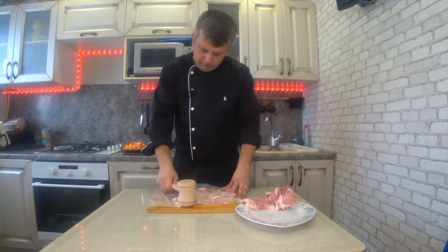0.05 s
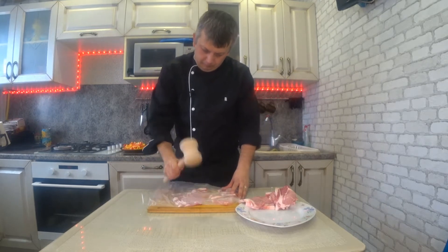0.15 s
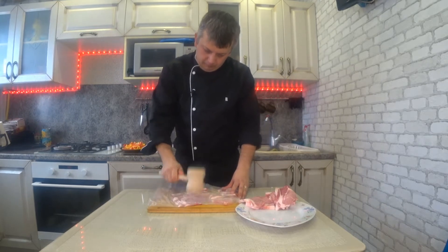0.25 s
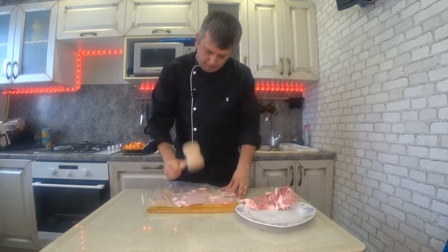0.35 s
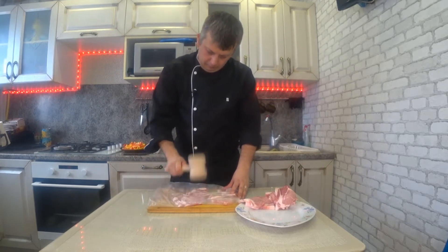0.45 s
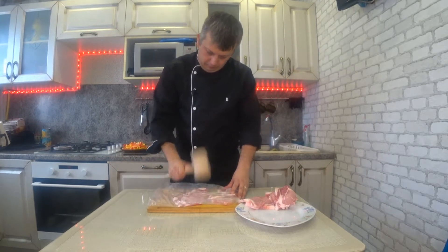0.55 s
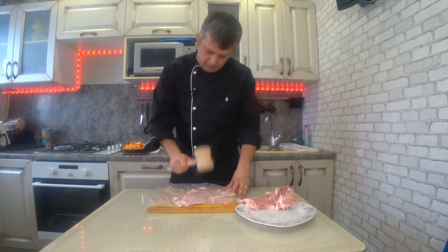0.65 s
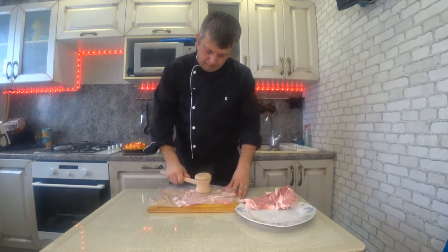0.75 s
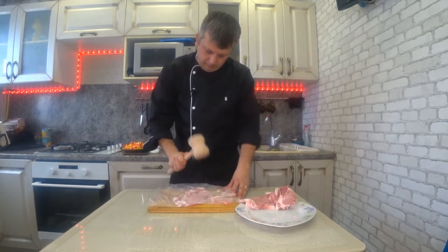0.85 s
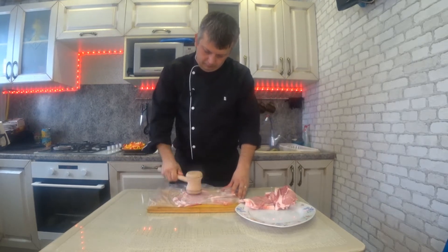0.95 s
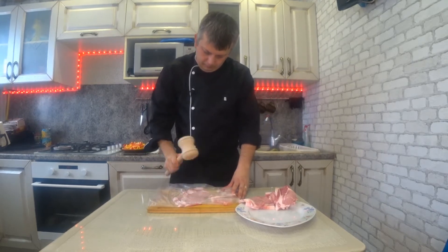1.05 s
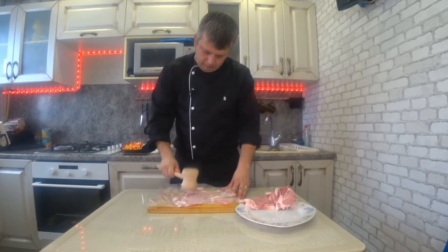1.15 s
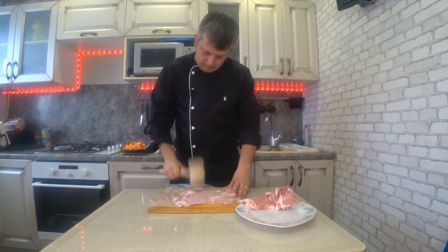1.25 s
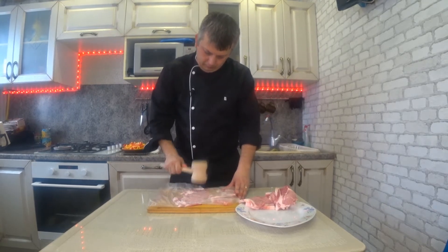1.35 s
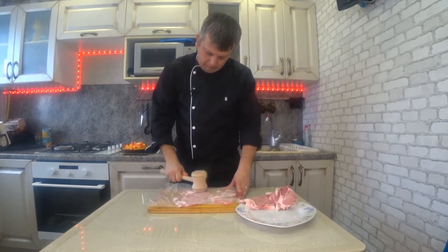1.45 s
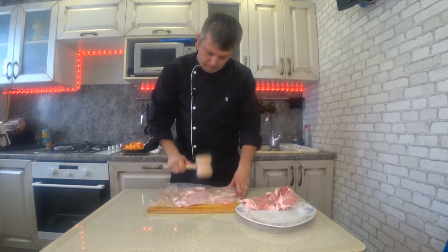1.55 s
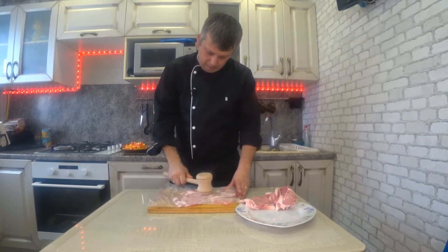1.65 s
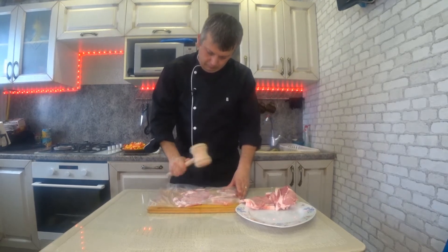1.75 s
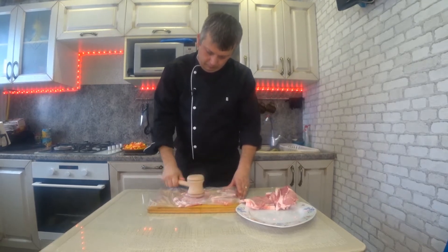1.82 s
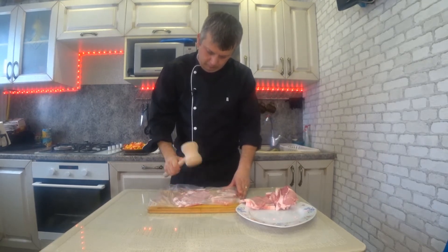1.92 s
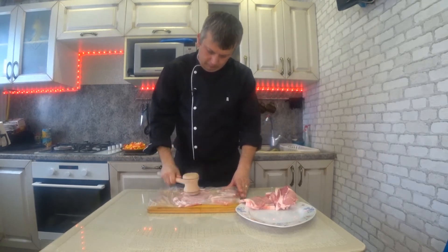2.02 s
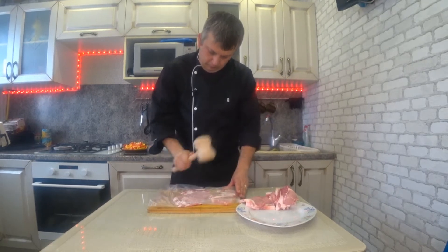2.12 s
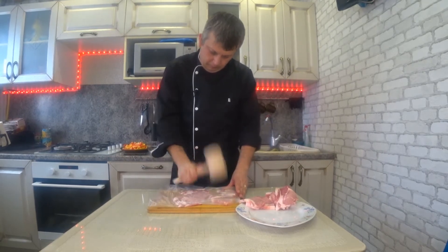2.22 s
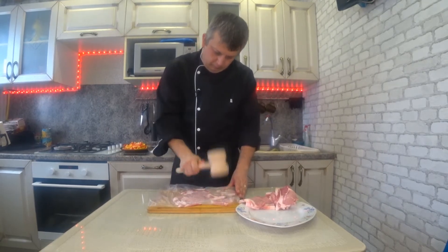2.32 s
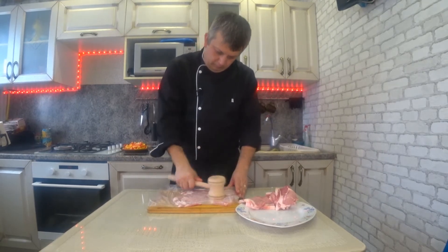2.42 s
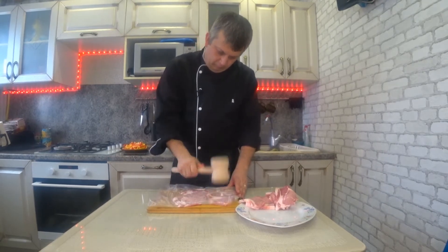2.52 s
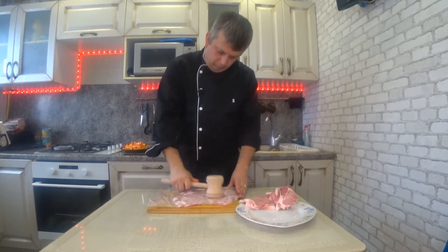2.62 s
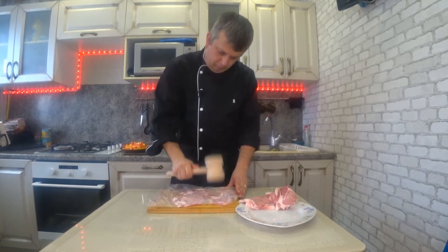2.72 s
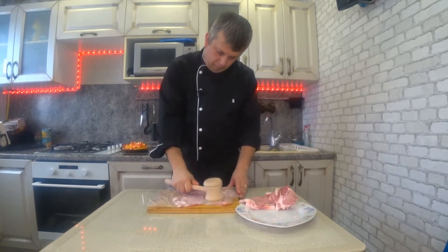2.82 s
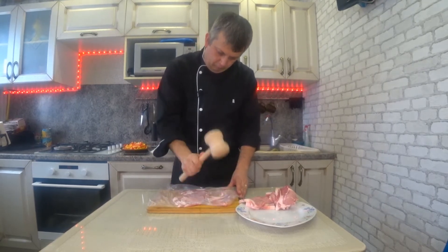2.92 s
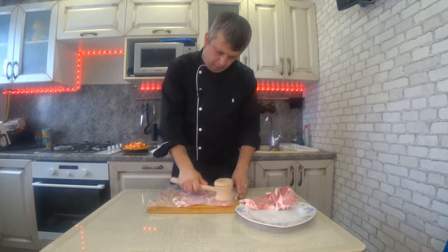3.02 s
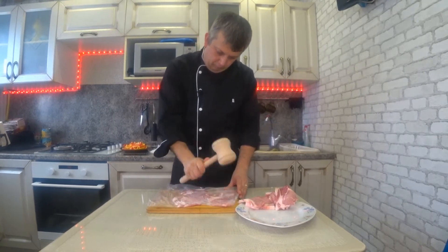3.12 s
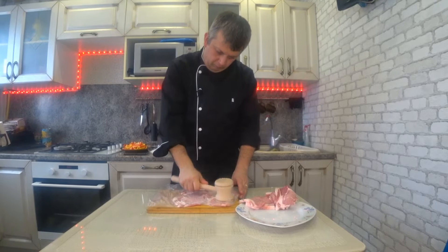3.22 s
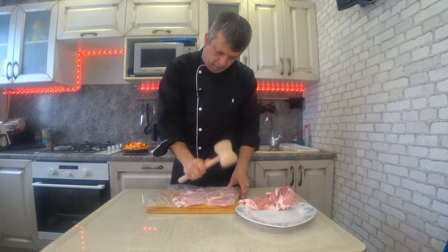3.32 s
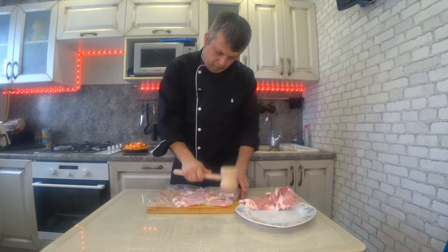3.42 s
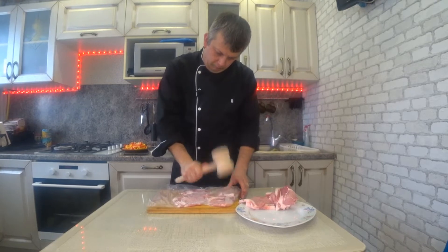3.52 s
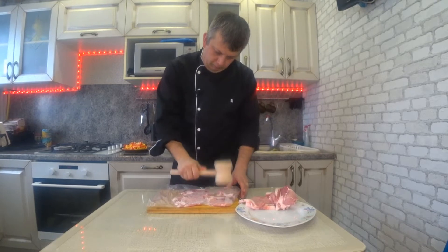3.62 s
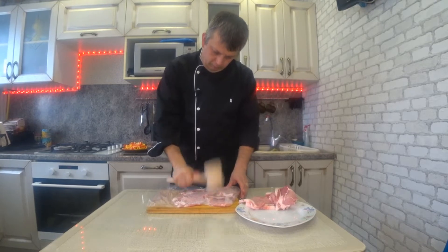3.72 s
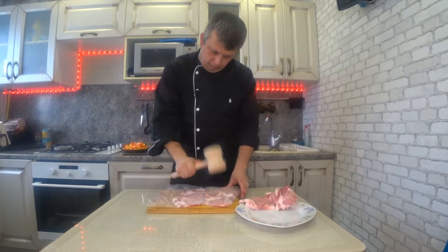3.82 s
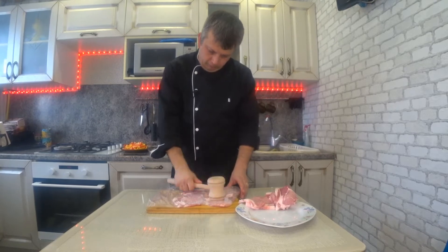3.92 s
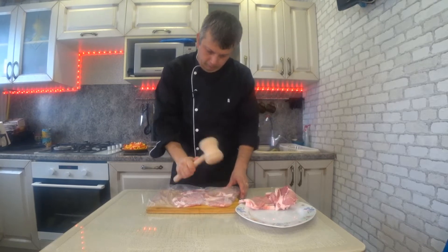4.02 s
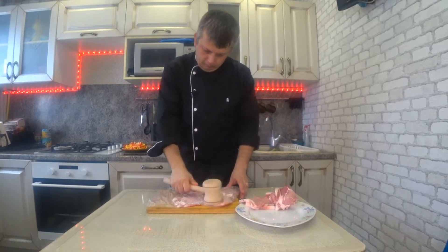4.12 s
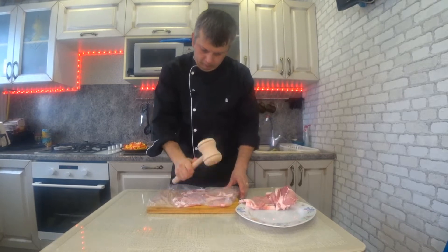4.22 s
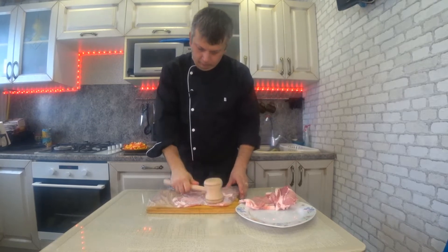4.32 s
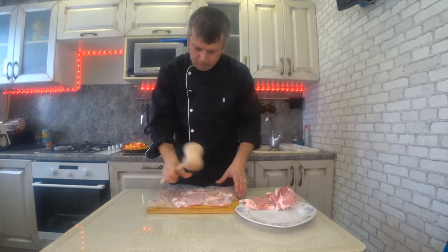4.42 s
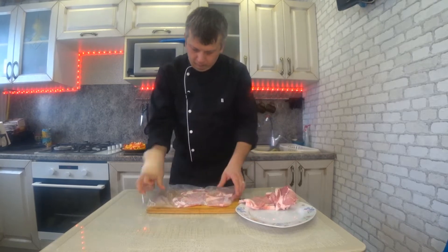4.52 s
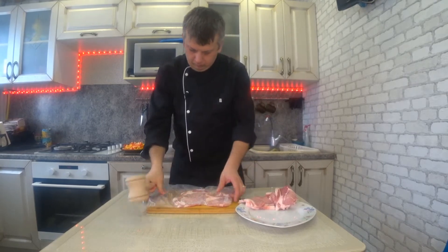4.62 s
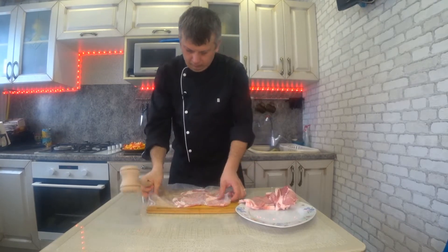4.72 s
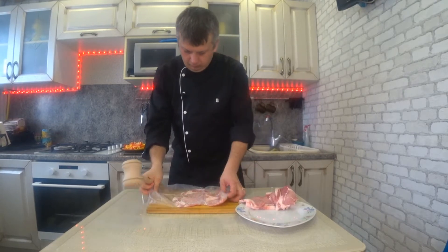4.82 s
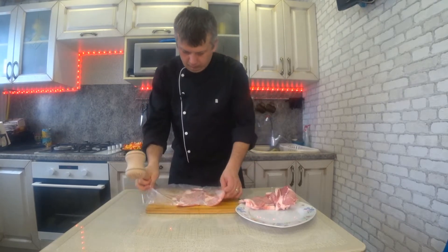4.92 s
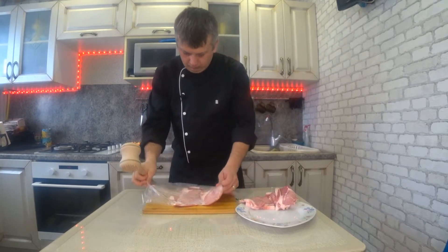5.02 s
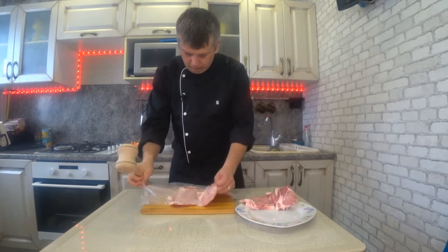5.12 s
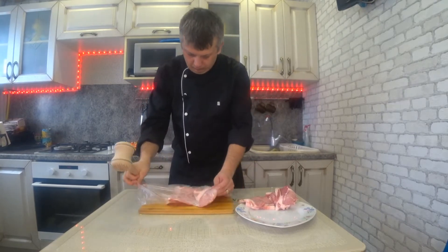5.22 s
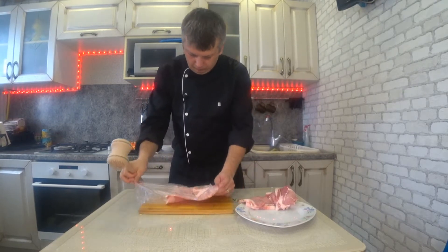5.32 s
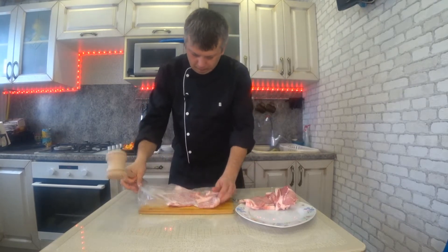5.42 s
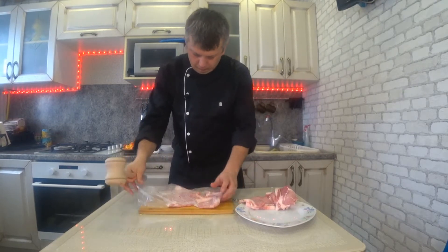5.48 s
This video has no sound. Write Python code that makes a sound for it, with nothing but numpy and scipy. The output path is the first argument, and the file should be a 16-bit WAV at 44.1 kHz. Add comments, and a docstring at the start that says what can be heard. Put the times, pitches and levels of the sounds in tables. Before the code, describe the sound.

A wooden mallet pounds meat in a plastic bag on a board, about five quick thuds a second, then the bag rustles in a small kitchen.

```python
"""A fridge hums, as two sine tones, under faint air noise in a small hard-walled kitchen.
From the start a wooden mallet pounds meat in a plastic bag on a board: each blow is a snap of squeezed air,
a thud of damped board swings and a ring of room modes under fading noise; the bag creaks in short bursts.
Then the bag is pulled about and rustles as random pops, the board is knocked and the meat is laid down with
a rumble. A fast gain control squashes the blows and pumps up the room's ring behind them."""
import sys
import numpy as np
from scipy import signal
from scipy.fft import rfft, irfft, next_fast_len
from scipy.io import wavfile
from scipy.ndimage import map_coordinates

SR = 44100
rng = np.random.default_rng(int(sys.argv[2]) if len(sys.argv) > 2 else 0)


def output_pcm(signal):
    """Save a mono or channel-first signal as 16-bit PCM at the path in sys.argv[1].

    Samples are clipped to [-1, 1] before scaling.
    """
    pcm = np.clip(np.atleast_2d(signal).T, -1, 1) * 32767
    wavfile.write(sys.argv[1], SR, np.round(pcm).astype(np.int16))


N = 244755
TIME = np.arange(N) / SR


def amp(db):
    """Level to amplitude: 20 dB is a factor of ten."""
    return 10 ** (np.asarray(db) / 20)


def unit(x):
    """Normalisation: x brought to rms 1."""
    return x / np.sqrt(np.mean(x ** 2) + 1e-20)


def along(points, hz):
    """Logarithmic frequency scale: (Hz, value) points are joined by straight lines on it."""
    f, v = np.transpose(points)
    return np.interp(np.log(hz + 1), np.log(f + 1), v)


def filtered(x, response):
    """Linear filtering: the spectrum of x is multiplied by a response of frequency."""
    n = x.shape[-1]
    padded = next_fast_len(n + 4096)
    spectrum = rfft(x, padded) * response(np.fft.rfftfreq(padded, 1 / SR))
    return irfft(spectrum, padded)[..., :n]


def noise(spectrum, size):
    """Coloured noise: white noise shaped by (Hz, dB) points, at rms 1."""
    return unit(filtered(rng.standard_normal(size), lambda hz: amp(along(spectrum, hz))))


def add(track, s, x):
    """Superposition: x is mixed into the track from time s on; what falls outside is lost."""
    start = round(s * SR)
    x, start = x[max(-start, 0):], max(start, 0)
    track[start:start + len(x)] += x[:max(N - start, 0)]


def fading(x):
    """Reverberant decay: each frequency of x falls by 60 dB in its own time, the top soonest."""
    # Decay of the kitchen. Each row: frequency in Hz, t60 in seconds.
    decay_times = [(100, 0.47), (400, 0.38), (1500, 0.38), (4000, 0.41), (10000, 0.3)]
    hz, t, z = signal.stft(x, SR, nperseg=256)
    decay = amp(-60 * t / along(decay_times, hz)[:, None])
    return signal.istft(z * decay, SR, nperseg=256)[1][:len(x)]


def fridge():
    """Steady tonal hum: sine tones of constant level and random phase."""
    # Tones of the fridge. Each row: frequency in Hz, rms level in dB.
    tones = [(48.4, -52), (183, -63)]
    return sum(amp(db) * np.sqrt(2) * np.sin(2 * np.pi * (hz * TIME + rng.random())) for hz, db in tones)


def air():
    """Stationary background noise: random air motion, strongest in the bass."""
    # Colour of the background. Each row: frequency in Hz, relative level in dB per Hz.
    air_colour = [(20, -0.5), (45, 3), (80, -4), (160, -2.5), (400, -6), (1000, -20.5), (4000, -24),
                  (11000, -32.5)]
    return amp(-47) * noise(air_colour, N)


def pocket(x, centre_hz, lift_db, width):
    """Cavity resonance: air trapped under the film lifts a band as it is squeezed out."""
    return filtered(x, lambda hz: amp(lift_db / (1 + ((hz - centre_hz) / (width * centre_hz)) ** 2)))


def snap(t, swell, pocket_hz, shut=0.0031, echo_db=-15, echo_s=0.0094):
    """Jet noise: air spits ever harder from the closing gap until impact at t = 0; the near wall answers."""
    # Colour of the hiss. Each row: frequency in Hz, relative level in dB per Hz.
    hiss_colour = [(200, 19), (700, 3), (1500, 4.5), (3000, 2), (6000, -2), (11000, -7)]
    hiss = unit(pocket(noise(hiss_colour, len(t)), pocket_hz, lift_db=2.5, width=0.059))
    squirt = np.exp(np.minimum(t / swell, -t / shut))
    echo = amp(echo_db) * np.exp(np.minimum((t - echo_s) / 0.0049, (echo_s - t) / 0.022))
    return hiss * (squirt + echo)


def thud(t, stiff_hz=135):
    """Damped oscillation: the board is pushed down and swings back; it is too small to radiate deep bass."""
    # First swing of the board, damped by the meat, before a pitch shift from blow to blow.
    # Each row: frequency in Hz, level in dB, t60 in seconds.
    swings = [(147, -8.5, 0.14), (220, -4.5, 0.034), (400.5, -7.5, 0.042), (525, -47, 0.023)]
    turn = 2 * np.pi * t * np.exp(0.07 * rng.standard_normal())
    swing = sum(amp(db - 60 * t / t60) * np.sin(hz * turn) for hz, db, t60 in swings)
    return -signal.lfilter(*signal.butter(2, stiff_hz, "high", fs=SR), swing)


def room_modes(t, place):
    """Modal excitation: the place of the blow sets the level of each low mode of table and kitchen."""
    # Low ring of table and kitchen, before small random shifts of pitch and level at each blow.
    # Each row: frequency in Hz, level in dB struck at the board's left, in dB at its right, t60 in seconds.
    modes = [(100.7, -12.5, -16, 0.64), (127, -27, -14, 0.59), (147.3, -7.5, -3, 0.42),
             (158.8, -16, -10.5, 0.32), (181.6, 2.5, -23.5, 0.48), (200.2, -2.5, -5, 0.33),
             (241.5, -10.5, -5, 0.73), (269.8, -4.5, -1, 0.62), (304, -4.5, -5, 0.44),
             (310.6, 2.5, 1.5, 0.31), (383.7, -1, -20.5, 0.27), (403, -16, -29, 0.48),
             (468.3, -18, -6.5, 0.52), (560.6, -4.5, -7, 0.22), (590, -8.5, -11, 0.22)]
    detune = 0.008  # the load of meat and mallet shifts the pitch, as a share of the frequency
    ring = np.zeros(len(t))
    for hz, left, right, t60 in modes:
        level_db = left + place * (right - left) + rng.normal(0, 2.14)
        shifted_hz = hz * (1 + detune * rng.normal())
        ring += amp(level_db - 60 * t / t60) * np.sin(2 * np.pi * (shifted_hz * t + rng.random()))
    return ring


def reverberation(t, place, knock_db, smack_db, pocket_hz, low_rise=0.011, high_rise=0.0072):
    """Reverberation: the kitchen rings on with the colour of the blow, low modes under a dense wash."""
    # Colours of deep boom, wooden knock, wet smack and film fizz.
    # Each row: frequency in Hz, relative level in dB per Hz.
    boom_colour = [(25, 6), (70, -11), (105, -6), (150, 0.5), (270, 3), (335, 6.5), (370, -69), (600, -33)]
    knock_colour = [(280, -38), (375, -0.5), (470, -1.5), (600, -7), (760, -11), (1000, -18), (1400, -31),
                    (3000, -75)]
    smack_colour = [(450, -17), (850, 0.5), (1100, 0), (1450, 4.5), (1900, 2), (2400, -1.5), (3500, -7.5),
                    (5000, -14.5), (10000, -45)]
    fizz_colour = [(1500, -39), (3000, 1.5), (4300, -1), (5500, -2), (7500, -5), (11000, -9.5)]
    n = len(t)
    wash = amp(-6) * noise(boom_colour, n) + amp(knock_db) * noise(knock_colour, n)
    wood = amp(-4) * room_modes(t, place) + fading(wash)
    fizz = amp(-6.5) * noise(fizz_colour, n)
    film = amp(smack_db) * (noise(smack_colour, n) + fizz)
    clumps = amp(map_coordinates(rng.standard_normal(n), [t * 250]))  # echoes arrive in clumps
    film = fading(clumps * pocket(film, pocket_hz, lift_db=3, width=0.13))
    # bright reflections pile up sooner; the standing waves need a few trips across the room
    return wood * (1 - np.exp(-t / low_rise)) + film * (1 - np.exp(-t / high_rise))


def mallet():
    """Impact: every blow snaps the bag, swings the board and sets the room ringing."""
    # Mallet blows; the first lands before time 0, so only its tail is heard.
    # Each row: time in seconds, room ring in dB, wood knock over the ring in dB, wet smack over the ring
    # in dB, direct thud in dB, direct snap in dB, air pocket in Hz.
    blows = [ (-.125, -13, -19, -12, -3, -12.5, 3020), (0.0426, -9, -7.5, -14, 0, -8.5, 6400),
             (0.2083, -9, -4.5, -10.5, -7, -21, 7740), (.404, -12, -12.5, -9.5, -0.5, -5.5, 4450),
             (.5815, -17, -6, -8.5, -22, -31, 1680), (.7514, -13.5, 0.5, -4, -1, -11, 3900),
             (0.9382, -16.5, -7.5, -7.5, -1, -6.5, 6550), (1.12, -14, -3, -10, 0, -8.5, 2680),
             (1.3013, -17, -6, -7.5, 3.5, -1, 6740), (1.4862, -16.5, -3, -8, -0.5, -8.5, 1800),
             (1.6583, -15.5, 0.5, -5, -3, -14, 4000), (1.8359, -15, -5, -7.5, -13, -23.5, 4000),
             (2.006, -14, -3, -9, 0.5, -17, 3950), (2.2446, -17, -13, -8, -3, -5, 1780),
             (2.447, -11, -5, -13, 8, -4, 1330), (2.6575, -15, -6.5, -13.5, -6, -13.5, 3340),
             (2.8366, -12.5, -7.5, -11, -4, -8.5, 5840), (3.0252, -15, -9.5, -9, 1, -0.5, 5340),
             (3.2094, -13, -3.5, -11.5, -5.5, -9, 1100), (3.3837, -18, -8, -8.5, -12, -5, 1850),
             (3.5558, -14, -3.5, -11, -6.5, -15, 1840), (3.7384, -12.5, -6.5, -11, -10, -23, 7400),
             (3.9337, -14, -3, -10, -6.5, -15.5, 1140), (4.1224, -15, -5.5, -11.5, -4.5, -6, 2700),
             (4.297, -15.5, -2.5, -11.5, -9, -26, 1070), ]
    # The mallet works along the board. Each row: time in seconds, place from 0 (left) to 1 (right).
    places = [(0, 0.24), (2.0, 0.084), (2.3, 0.59), (4.4, 0.53)]
    # swell of the snap at a 0 dB thud; a softer blow squeezes the air out more slowly
    squirt_s, squirt_slowing = 0.0006, 0.42
    lead = 0.02  # seconds of snap before impact
    out, t = np.zeros(N), np.arange(SR * 2 // 3) / SR
    for s, ring_db, knock_db, smack_db, thud_db, snap_db, pocket_hz in blows:
        place = np.interp(s, *np.transpose(places))
        swell = squirt_s / amp(thud_db) ** squirt_slowing
        add(out, s - lead, amp(snap_db) * snap(t - lead, swell, pocket_hz))
        add(out, s + 0.00059, amp(thud_db) * thud(t))
        add(out, s, amp(ring_db) * reverberation(t, place, knock_db, smack_db, pocket_hz))
    return out


def crackle(rate, blur_db):
    """Random impulses: tiny buckles of the film, rate a second, in flurries and blurred by noise; rms 1."""
    # Colour of the film. Each row: frequency in Hz, relative level in dB per Hz.
    film_colour = [(900, -26), (2200, -2), (4000, -2.5), (6300, 0), (9000, -3), (11000, -7.5)]
    pops = (rng.random(N) < rate / SR) * rng.standard_normal(N)
    flurries = amp(1.5 * map_coordinates(rng.standard_normal(N), [TIME * 70]))
    grains = flurries * (unit(pops) + amp(blur_db) * rng.standard_normal(N))
    return unit(filtered(grains, lambda hz: amp(along(film_colour, hz))))


def reflections(x):
    """Convolution with a decaying noise of unit energy: the kitchen's answer to x."""
    tail = fading(rng.standard_normal(SR // 2))
    return signal.fftconvolve(x, tail / np.linalg.norm(tail))[:N]


def creaking():
    """Stick and slip: the bag creaks in short bursts under the holding hand, and the room answers."""
    # Creaks of the bag. Each row: time of the peak in seconds, level in dB, decay constant in seconds.
    creaks = [(0.034, -38, 0.0068), (1.286, -46, 0.0066), (2.205, -38, 0.018), (2.65, -42, .008),
              (3.371, -38.5, 0.0056), (4.846, -38, .02), (5.28, -39, .006), (5.297, -42, .008),
              (5.407, -29.5, 0.011)]
    bursts = sum(amp(db) * np.exp(np.minimum((TIME - s) / 0.0028, (s - TIME) / length))
                 for s, db, length in creaks)
    sound = bursts * crackle(rate=3000, blur_db=-31)
    return sound + reflections(sound)


def stroke(s, hold, attack, release):
    """Exponential envelope: it swells up to time s, holds and dies away."""
    return np.exp(np.minimum(np.minimum((TIME - s) / attack, (s + hold - TIME) / release), 0))


def rustling():
    """Buckling and friction: each pull makes the film crackle and rubs its folds together."""
    # Pulls at the bag. Each row: time of full pull in seconds, hold in seconds, film crackle in dB,
    # rubbing of the folds in dB.
    pulls = [(4.558, .04, -49, -50.5), (4.625, .04, -43.5, -47.5), (4.681, 0.034, -36, -41.5),
             (4.79, .04, -45.5, -57), (4.844, 0.15, -38, -43.5), (5.015, 0.073, -36, -40),
             (5.134, 0.064, -36.5, -39.5), (5.21, .16, -35, -37.5), (5.395, 0.023, -31, -33),
             (5.545, .05, -39, -54)]
    # Colour of the rubbing folds. Each row: frequency in Hz, relative level in dB per Hz.
    folds_colour = [(100, -15), (200, -22), (400, 3), (650, -0.5), (1100, 2), (1900, 3.5), (3000, -17),
                    (6000, -6.5)]
    attack_s, release_s = 0.022, 0.039  # the film tightens quickly and relaxes more slowly
    settle_db, settle_s = -4, 0.078  # creases keep ticking after the hand stops
    crackling, rubbing = np.zeros(N), np.zeros(N)
    for s, hold, crackle_db, folds_db in pulls:
        settling = amp(settle_db) * stroke(s, hold, attack_s, settle_s)
        pull = np.maximum(stroke(s, hold, attack_s, release_s), settling)
        # overlapping pulls add in power
        crackling = np.hypot(crackling, amp(crackle_db) * pull)
        rubbing = np.hypot(rubbing, amp(folds_db) * pull)
    return crackling * crackle(rate=3300, blur_db=3.5) + rubbing * noise(folds_colour, N)


def board_bumps():
    """Modal ringing: soft bumps excite the board and the room, more slowly the longer the contact."""
    # Bumps on the board. Each row: time in seconds, level in dB, contact time constant in seconds.
    bumps = [(4.578, -32, 0.0036), (4.7224, -20.5, 0.00035), (5.383, -30.5, 0.003), (5.413, -27.5, 0.00055)]
    # Modes of the board. Each row: frequency in Hz, level in dB, t60 in seconds.
    board_modes = [(110, -33, 0.021), (184, -11, 0.12), (376.6, 6, 0.035), (496, -9, 0.014),
                   (694, -8, 0.022), (1370, -3, 0.017), (2020, -9, 0.017)]
    # Colour of their echo. Each row: frequency in Hz, relative level in dB per Hz.
    echo_colour = [(90, -19), (180, 6.5), (270, -4), (390, 3), (700, -5), (1100, -12), (2000, -19),
                   (5000, -37)]
    out, t = np.zeros(N), np.arange(SR // 3) / SR
    ring = sum(amp(db - 60 * t / t60) * np.sin(2 * np.pi * hz * t) for hz, db, t60 in board_modes)
    for s, db, contact in bumps:
        wash = fading(noise(echo_colour, len(t)))
        add(out, s, amp(db) * (ring + amp(-12) * wash) * (1 - np.exp(-t / contact)))
    return out


def meat_shoves():
    """Friction noise: meat shoved and laid down on the board gives a low rumble."""
    # Shoves of the meat. Each row: time of full shove in seconds, hold in seconds, rumble in dB.
    shoves = [(5.304, 0.063, -29.5), (5.40, .04, -38), (5.467, .015, -35)]
    # Colour of the rumble. Each row: frequency in Hz, relative level in dB per Hz.
    rumble_colour = [(15, 9), (35, 9.5), (80, -5.5), (140, -7), (300, -44), (900, -68)]
    shoving = sum(amp(db) * stroke(s, hold, attack=0.006, release=0.025) for s, hold, db in shoves)
    return shoving * noise(rumble_colour, N)


def scene():
    """Near mono: all stands straight ahead; a faint phase-shifted copy of the middle is the side."""
    # Level of the faint side signal. Each row: frequency in Hz, side against middle in dB.
    side_levels = [(30, -22), (200, -57), (700, -43), (2500, -30.5), (5500, -25), (10000, -28)]
    mid = fridge() + air() + mallet() + creaking() + rustling() + board_bumps() + meat_shoves()
    scatter = rng.standard_normal(SR // 50) * np.hanning(SR // 50)
    skew = scatter - scatter[::-1]  # a pure phase difference: neither side is louder
    side = signal.fftconvolve(mid, skew / np.linalg.norm(skew), "same")
    side = filtered(side, lambda hz: amp(along(side_levels, hz)))
    return np.array([mid + side, mid - side])


def gain_control(x, threshold_db, release_db, attack, range_db):
    """Compression: peaks duck the gain in ms, by range_db at most; it recovers by release_db a second."""
    level_db = 20 * np.log10(np.abs(x).max(axis=0) + 1e-9)
    over = np.clip(level_db - threshold_db, 0, range_db)
    held = np.maximum.accumulate(over + release_db * TIME) - release_db * TIME
    keep = np.exp(-1 / (attack * SR))
    return x * amp(-signal.lfilter([1 - keep], [1, -keep], held))


def record(dry):
    """Transducer chain: narrow-band microphone, gain control, clipping of peaks, bass cut, band limit."""
    mic_hz, top_hz = 11150, 16500  # upper limits of the microphone and of the whole chain
    heard = filtered(dry, lambda hz: np.clip((mic_hz - hz) / 300 + 0.5, 0, 1))
    level = gain_control(heard, threshold_db=-18.5, release_db=306, attack=0.0023, range_db=14)
    clipped = level / (1 + np.abs(level / amp(-13.7)) ** 6) ** (1 / 6)
    lean = filtered(clipped, lambda hz: hz / np.hypot(hz, 70))

    def band_limit(hz):
        """Low-pass response: overtones of the clipping above mic_hz are weakened, then cut at top_hz."""
        return np.where(hz < mic_hz, 1, amp(-9)) * np.clip((top_hz - hz) / 600 + 0.5, 0, 1)

    return filtered(lean, band_limit)


dry = scene()
out = record(dry)
output_pcm(out)
```